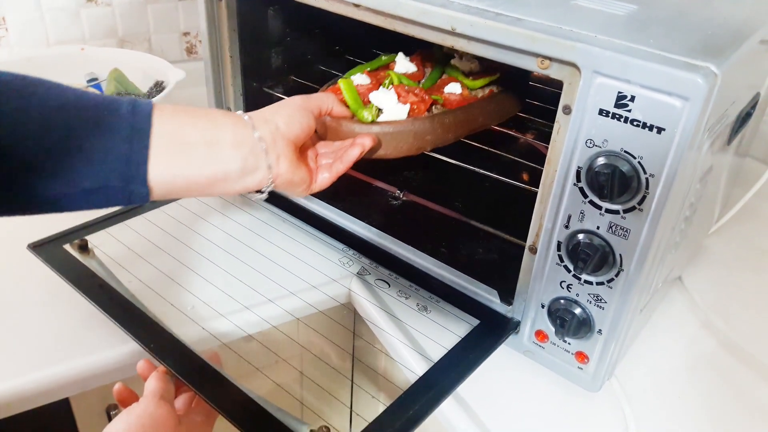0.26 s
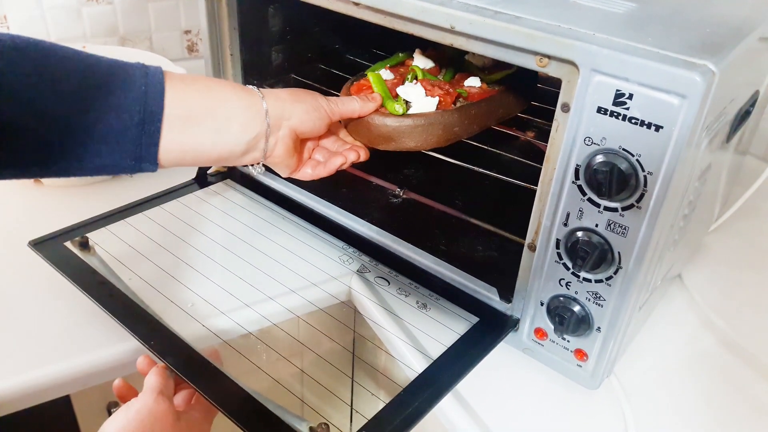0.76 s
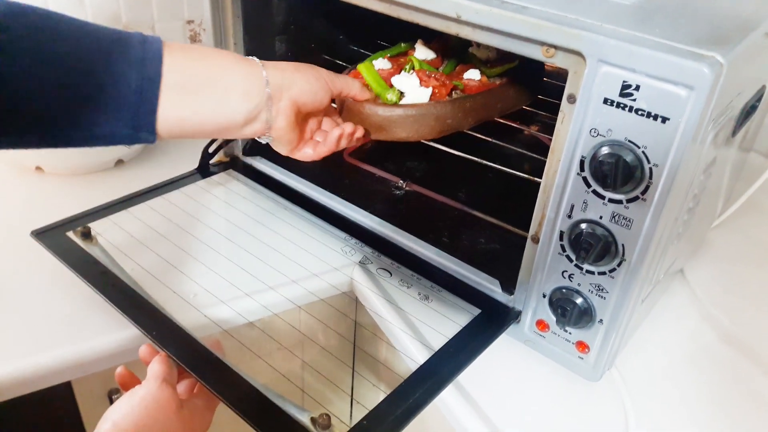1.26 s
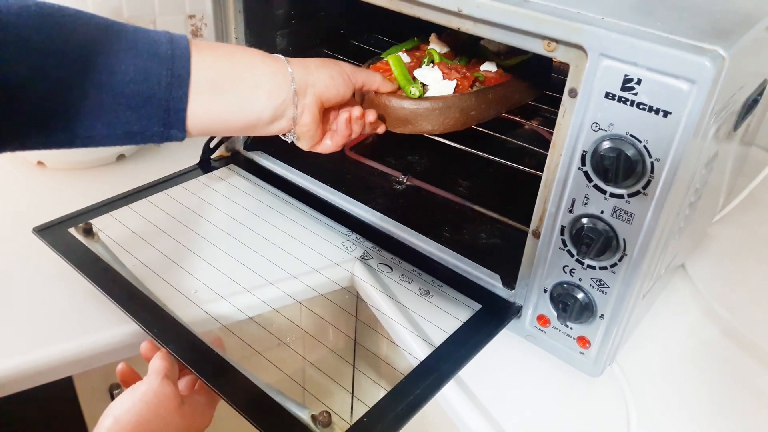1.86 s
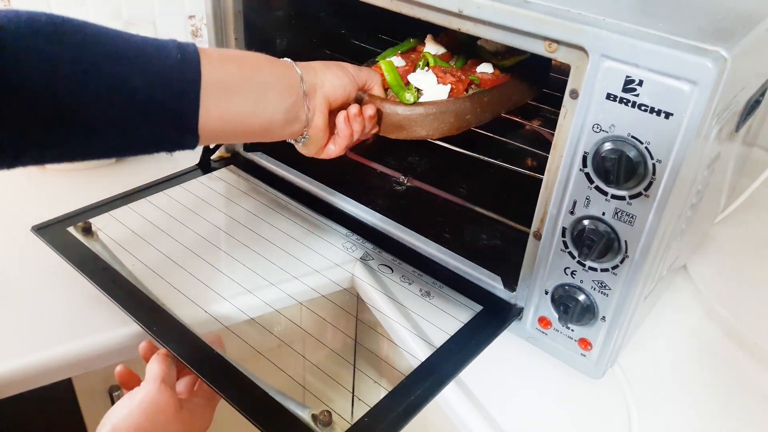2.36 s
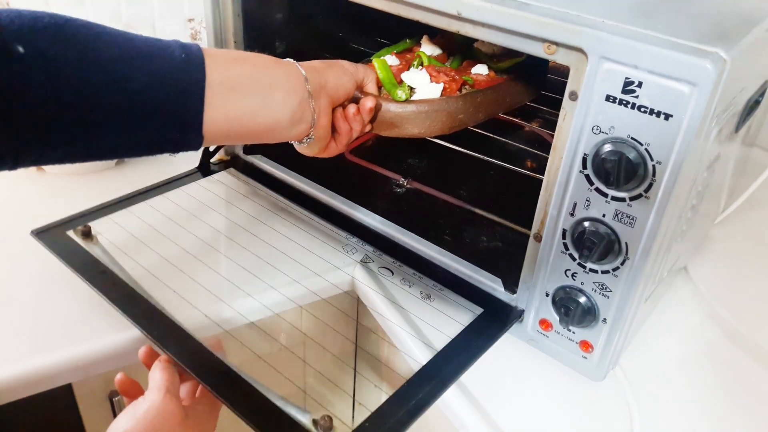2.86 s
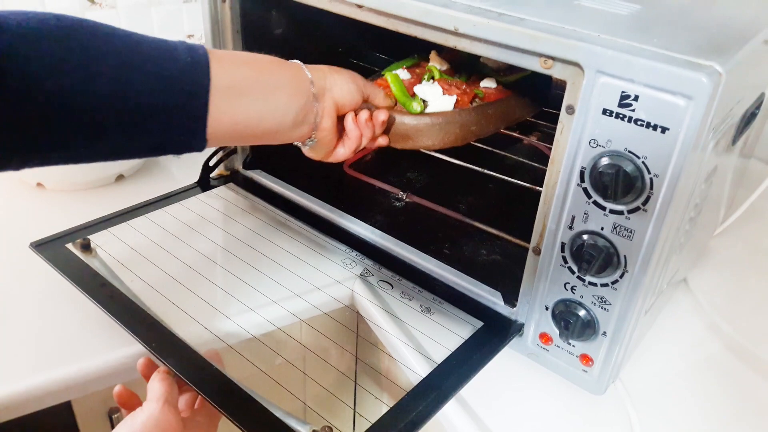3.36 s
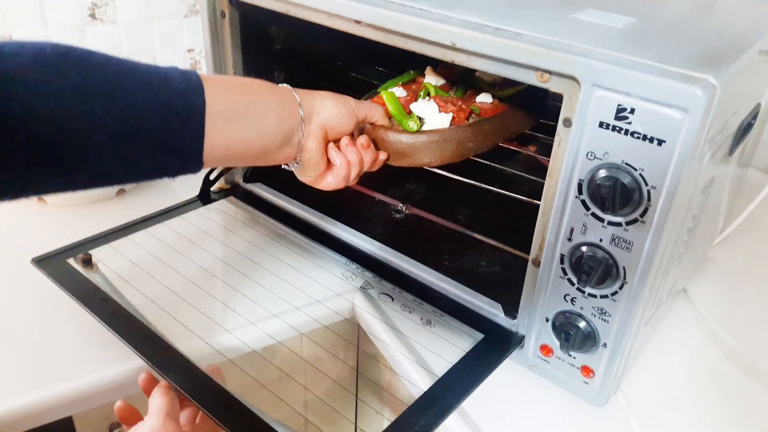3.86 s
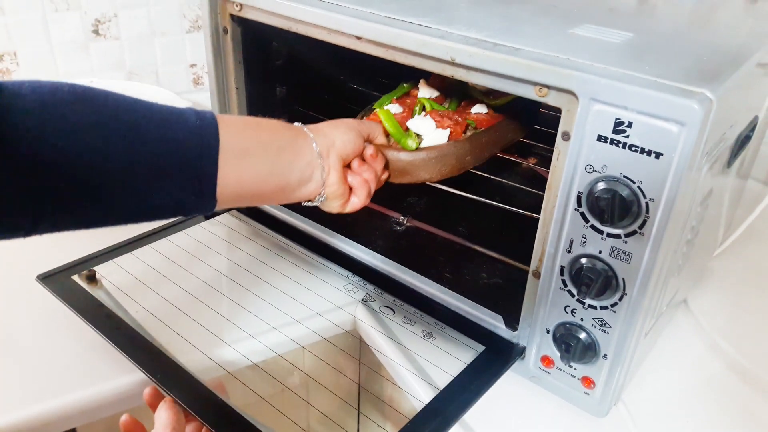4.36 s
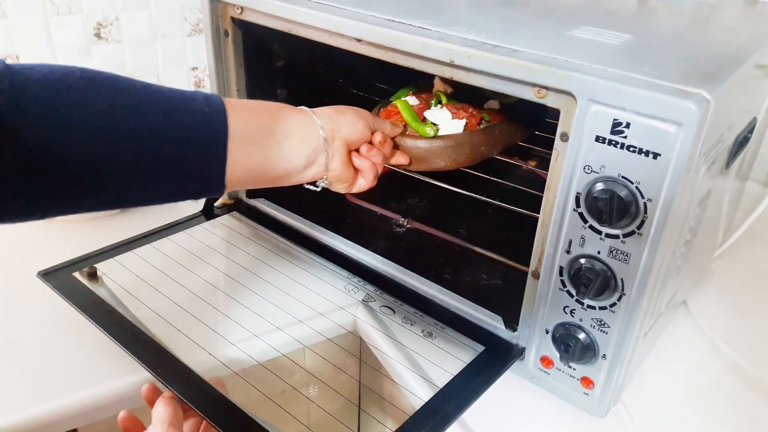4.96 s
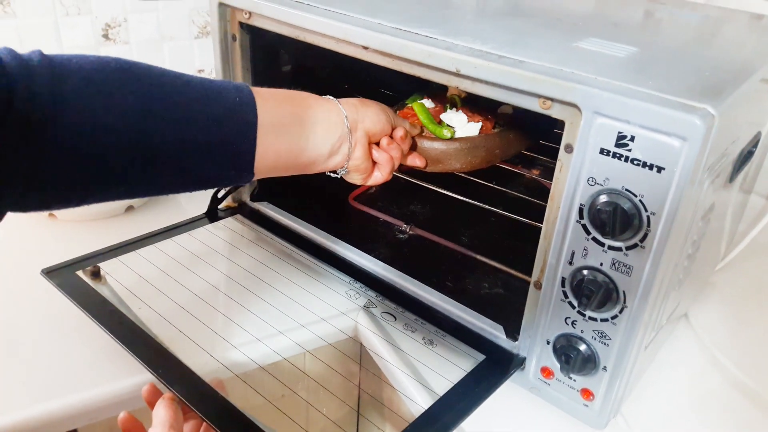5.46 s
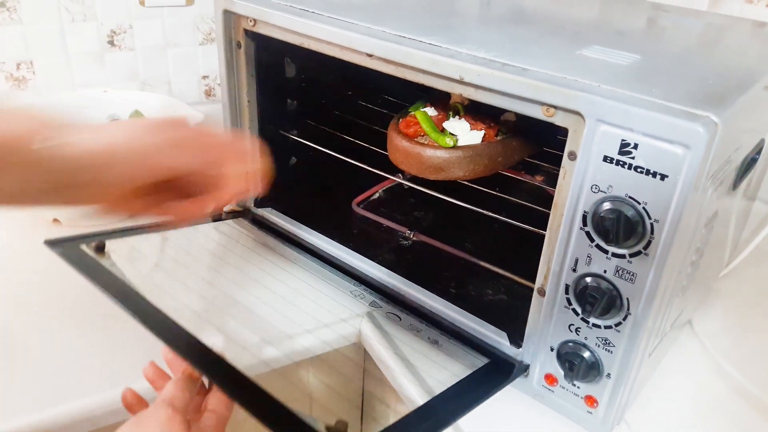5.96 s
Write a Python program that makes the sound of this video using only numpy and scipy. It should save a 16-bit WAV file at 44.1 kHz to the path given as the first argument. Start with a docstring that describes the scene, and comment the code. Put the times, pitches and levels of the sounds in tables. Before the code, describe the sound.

Short rough scrapes and clinks of earthenware on metal wires inside a small hollow oven, with faint ticking and a distant bird in a quiet kitchen.

```python
"""Clay grinds and knocks on wire: a baking dish is pushed in short strokes over the rack of a small open oven.
Rough noise and jolts drive the modes of dish, rack and box; knocks add chatter and ringing wires.
The sheet-metal box booms and the bumped rack rings low. The oven's timer ticks faintly as filtered noise bursts.
Farther off in the quiet kitchen a small bird chirps, a warbled whistle heard mostly as echo.
A microphone with two ports takes it in."""
import sys
import numpy as np
from scipy import signal
from scipy.fft import rfft, irfft
from scipy.io import wavfile
from scipy.ndimage import uniform_filter1d

SR = 44100
rng = np.random.default_rng(int(sys.argv[2]) if len(sys.argv) > 2 else 0)


def transcribe(signal):
    """Save signal, clipped to [-1, 1], as a 16-bit WAV file at the path in sys.argv[1]."""
    frames = np.atleast_2d(signal).T
    limited = np.clip(frames, -1, 1)
    pcm = np.round(limited * 32767).astype(np.int16)
    wavfile.write(sys.argv[1], SR, pcm)


def level_to_linear(level):
    """Convert decibel levels to linear amplitude factors, elementwise."""
    exponent = np.asarray(level, float) / 20
    return 10 ** exponent


N = 273323  # length [samples]


def evened(x):
    """Scales a signal to an rms of 1."""
    return x / np.sqrt(np.mean(x ** 2) + 1e-20)


def read(points, hz):
    """Reads a curve of (frequency, value) points along log frequency."""
    f, value = np.transpose(points)
    return np.interp(np.log(hz + 1), np.log(f + 1), value)


def add(mix, s, sound):
    """Adds a sound to the mix in place from time s, cut off at the end."""
    part = mix[..., round(s * SR):][..., :sound.shape[-1]]
    part += sound[..., :part.shape[-1]]


def humped(hz, broad, peaks):
    """Gain of a broad spectrum with resonances standing on it."""
    power = broad ** 2 + sum(level_to_linear(2 * db) / (1 + (2 * (hz - f) / w) ** 2) for f, w, db in peaks)
    return np.sqrt(power)


def causal(gain):
    """Minimum-phase impulse response of a gain curve, energy 1."""
    log = np.log(np.maximum(np.r_[gain, gain[-2:0:-1]], 1e-5))
    taps = np.fft.ifft(np.exp(log - 1j * signal.hilbert(log).imag)).real[:len(gain) // 2]
    return taps / np.linalg.norm(taps)


def ring(t, hz, t60):
    """One dying mode with a soft start."""
    return level_to_linear(-60 * t / t60) * np.sin(2 * np.pi * hz * t) * np.minimum(t * hz / 3, 1)


def strokes():
    """Levels of grinding, boom and grit, the rack's pitch and its shaking, from whichever stroke grinds loudest."""
    # pushes of the dish: (grit against grinding [dB], pitch of the rack before stiffening [Hz], shaking [dB],
    # curve of (time [s], grinding level [dB], boom level of the box [dB]))
    pushes = [ (-14.5, 203, -0.17, [(0.0, -47, -32.5), (0.15, -45, -36), (0.185, -42, -26.5),
              (0.225, -39.5, -31), (0.272, -37.5, -37), (0.352, -39.5, -28.5), (0.448, -41.5, -42),
              (0.486, -32, -30), (0.59, -48.5, -34.5), (0.664, -56, -61), (0.69, -60.5, -45)]),
              (-13.5, 189, 0.44, [(1.095, -58, -45), (1.122, -48, -42), (1.174, -49, -34),
              (1.272, -55, -45.5), (1.578, -49.5, -35.5), (1.62, -44, -33.5), (1.67, -45, -50),
              (1.758, -54.5, -46.5), (1.882, -73, -49), (1.935, -67.5, -61)]),
              (-16, 170, -11, [(2.105, -55, -49), (2.128, -53.5, -38), (2.135, -47, -28),
              (2.2, -52.5, -28.5), (2.235, -54, -31), (2.329, -52, -30), (2.419, -67, -39)]),
              (-14.5, 201, 0, [(2.43, -59, -41), (2.449, -51, -32), (2.531, -44, -36), (2.623, -57, -36.5),
              (2.647, -61.5, -52)]), (-21, 191, -2, [(2.715, -48, -38.5), (2.787, -49, -33.5),
              (2.917, -57.5, -43.5)]), (-21, 205, -1.5, [(3.02, -59, -41.5), (3.049, -58, -29.5),
              (3.113, -41, -48), (3.179, -51, -37.5), (3.245, -53.5, -54), (3.365, -47.5, -36),
              (3.473, -54, -41.5), (3.6, -67, -75)]), (-5.5, 216, -0.2, [(3.637, -59.5, -46.5),
              (3.691, -73.5, -57), (3.731, -65.5, -57)]), (-20.5, 190, -0.5, [(3.97, -55.5, -48),
              (4.052, -46.5, -31), (4.156, -41.5, -28.5), (4.232, -51.5, -40), (4.278, -56, -30),
              (4.35, -58.5, -41), (4.465, -48, -35)]), (-15.5, 220.5, 3.5, [(4.485, -34, -29),
              (4.579, -32.5, -33), (4.619, -32.5, -34), (4.677, -46.5, -37), (4.735, -58.5, -41.5),
              (4.801, -56, -56), (4.93, -63, -50)]), (-14.5, 208, -0.7, [(4.962, -39, -34.5),
              (5.048, -44.5, -36), (5.115, -44.5, -33), (5.14, -37.5, -30), (5.178, -47.5, -42),
              (5.278, -42.5, -36), (5.31, -44, -36), (5.452, -53, -37), (5.548, -70, -68)]), ]
    start_db_per_s, settle_db_per_s = 1498, 70  # a stroke sets in fast and the rack settles slowly
    stiffen_hz = 1200.5  # rise of the rack's pitch per unit of grinding force
    t, rows = np.arange(N) / SR, []
    for grit_db, rack_hz, shake_db, curve in pushes:
        s, grind_db, boom_db = np.transpose(curve)
        before_db = start_db_per_s * np.maximum(s[0] - t, 0)
        after_db = settle_db_per_s * np.maximum(t - s[-1], 0)
        grind_db = np.interp(t, s, grind_db) - before_db - after_db
        boom_db = np.interp(t, s, boom_db) - before_db - after_db
        pitch_hz = rack_hz + stiffen_hz * level_to_linear(grind_db)
        rows.append((grind_db, boom_db, grind_db + grit_db, pitch_hz, shake_db + 0 * t))
    rows = np.array(rows)
    strongest = rows[:, :1].argmax(axis=0)[None]
    return np.take_along_axis(rows, strongest, axis=0)[0]


def rubbing(grind_db, boom_db, grit_db, rack_hz, shake_db):
    """Sliding clay snags, sticks and breaks free: force on low, middle, bright and top modes, and the rack's hum."""
    hum_db, rumble_db = -9.5, -7.5  # the boom is part tone of the rack, part noise on the low modes
    jolts_per_s, jolt_db, thump_db = 70, 15.5, 6  # breaking free gives a tick and a short one-sided thump
    snags = level_to_linear(3.43 * np.minimum(rng.exponential(1, N), 4.8))
    snags *= (rng.random(N) < 1200 / SR) * rng.choice([-1, 1], N)
    uneven_db = 1.3 * evened(uniform_filter1d(rng.standard_normal(N), 500))  # the hand's pressure wavers
    rough = evened((evened(snags) + 0.87 * rng.standard_normal(N)) * level_to_linear(uneven_db))
    jolts = level_to_linear(3.5 * np.minimum(rng.exponential(1, N), 3)) * (rng.random(N) < jolts_per_s / SR)
    low_db = boom_db + rumble_db + shake_db
    bright_db = 0.54 * grind_db + 0.43 * grit_db
    force = (rough - level_to_linear(jolt_db) * jolts) * level_to_linear(np.array([low_db, grind_db, bright_db, grit_db]))

    # the rubbed rack keeps humming, its pitch shaken by the rough contact
    shake, swell = (evened(uniform_filter1d(v, 1000)) for v in rng.standard_normal((2, N)))
    shaken_hz = rack_hz * (1 + 0.04563 * level_to_linear(shake_db) * shake)
    swell_db = 0.95 * level_to_linear(shake_db) * swell
    tones = level_to_linear(boom_db + hum_db + swell_db) * np.sin(2 * np.pi * np.cumsum(shaken_hz) / SR)
    thumps = np.convolve(jolts * level_to_linear(grind_db + thump_db), np.hanning(70))[:N]
    tones -= signal.lfilter(*signal.butter(2, 170, "high", fs=SR), thumps)  # the small box radiates no deep bass
    return force, tones


def knocks(force, tones, grind_db):
    """Adds knocks: the dish chatters briefly on a wire, pushes the box softly and rings wires near the struck spot."""
    # knocks of the dish on the wires: (time [s], level [dB], clink against it [dB], brightness against it [dB],
    # pitch near which the struck spot rings [Hz])
    hits = [(0.08, -31.5, -17, -22, 1160), (0.105, -20.5, -35, -4.5, 1170),
            (0.383, -29.5, -2.5, -4.5, 1160), (0.481, -21.5, -13, -6.5, 1340), (0.513, -18, -2, -5.5, 2030),
            (1.174, -29.5, -1.5, -10.5, 594), (1.364, -38.5, -18, 2.5, 1470), (1.417, -30, -5, -2, 1500),
            (1.482, -30, 0.5, -4.5, 1920), (1.538, -31.5, -6, -8.5, 2040), (1.566, -28.5, -6, -12, 1450),
            (1.601, -23, -3.5, -5.5, 1236), (1.665, -35.5, -22, 1.5, 1320), (1.832, -41, -1, -18, 600),
            (2.133, -27.5, -4, -12, 1340), (2.249, -25.5, -14, -12.5, 680),
            (2.326, -30.5, -15.5, -20, 1280), (2.44, -43, -0.5, -2, 704), (2.715, -32, -18, -8.5, 2216),
            (3.028, -35, -18, -10, 1050), (3.061, -32, -7, -10.5, 590), (3.096, -21.5, -2, -2.5, 1100),
            (3.117, -26, -3, -17, 1170), (3.287, -30.5, -10, -17, 1940), (3.369, -22, 0.5, -8.5, 1834),
            (3.503, -43, -1, -0.5, 2100), (3.692, -44, -4, -7, 1124), (3.986, -38.5, -3, -5.5, 1077),
            (4.029, -21, -6, -5, 664), (4.107, -20.5, -12, -12, 1100), (4.255, -22, -4, -9.5, 1490),
            (4.378, -38.5, 4.5, -16, 2010), (4.422, -40, -9, -16, 1380), (4.451, -33.5, -2, -19.5, 1272),
            (4.482, -20, -7, -3, 1610), (4.506, -18, -14, -3.5, 1590), (4.549, -16, -13, -8, 1740),
            (4.57, -19.5, -3, -3.5, 666), (4.853, -37, -34, -3.5, 694), (4.956, -32, 2, -1, 2117),
            (5.034, -33, 0.5, 1.5, 705), (5.099, -26, -5.5, -7, 675), (5.128, -24.5, -0.5, -7.5, 644),
            (5.147, -26.5, -10, -5, 1130), (5.236, -25, -12, -12, 1680), (5.264, -25, -9, -8, 1570),
            (5.329, -24.5, -7, -7.5, 1934), (5.384, -24.5, -7.5, -4.5, 1500), (5.42, -31, -7.5, -9, 1097)]
    # wires of the rack: (frequency [Hz], decay time t60 [s])
    wire_modes = [(597, 0.035), (675, 0.085), (750, 0.062), (980, 0.043), (1075, 0.073), (1170, 0.1),
                  (1310, 0.073), (1460, 0.049), (1545, .065), (1680, 0.093), (1935, 0.034), (2110, 0.04),
                  (2210, 0.17), (2400, 0.041)]
    rattle_t60_s, rattle_rise_s = 0.071, 0.001
    climb_s, look_back_s = 0.011, 0.021  # a sliding dish climbs on to the wire: slower when grinding rivals the knock
    spot_octaves, octave_db = 0.056, -12.5  # spread of the spot; modes an octave away ring too
    grit_slope, grit_db = 1.5, -5  # the top treble follows the brightness
    blunt_hz = 11100  # rounded clay softens the top
    t = np.arange(SR // 2) / SR
    short_t = t[:6000]
    slowness = np.array([[1], [.8], [.6]])  # the treble rises and dies first
    fade = level_to_linear(-60 * short_t / (rattle_t60_s * slowness))
    wires = np.array([ring(t, hz, t60) for hz, t60 in wire_modes])
    wire_hz = np.transpose(wire_modes)[0]
    for s, db, clink_db, bright_db, hz in hits:
        rise_s = rattle_rise_s + climb_s * level_to_linear(grind_db[round((s - look_back_s) * SR)] - db)
        shape = fade * (1 - np.exp(-short_t / (rise_s * slowness))) ** 2
        levels_db = db + np.array([[-3], [bright_db], [grit_slope * bright_db + grit_db]])
        noise = rng.standard_normal(6000)
        # a small hard spot misses the low modes
        chatter = signal.lfilter(*signal.butter(2, 0.52 * hz, "high", fs=SR), noise)
        chatter = signal.lfilter(*signal.butter(2, blunt_hz, fs=SR), chatter)
        add(force[1:], s - .0025, chatter * shape * level_to_linear(levels_db))
        add(force[0], s, level_to_linear(db - 12.5) * np.hanning(40))  # one soft push on the box
        off = np.abs(np.log2(wire_hz / hz))
        near = np.exp(-(off / spot_octaves) ** 2)
        near += level_to_linear(octave_db) * np.exp(-((off - 1) / spot_octaves) ** 2)
        clink = near / np.linalg.norm(near) @ wires
        add(tones, s, level_to_linear(db + clink_db) * clink * (1 - np.exp(-t / rise_s)))


def bumps(tones):
    """Adds bumps of the whole rack, which rings low, longest once the hand lets go."""
    # bumps: (time [s], level before beating [dB], decay time t60 [s])
    rack_bumps = [(0.224, -26, 0.14), (2.144, -28.5, 0.16), (3.135, -48, 0.11), (4.556, -19.5, 0.21),
                  (5.47, -50, 1)]
    t = np.arange(SR // 2) / SR
    beat = 1 + 0.63 * np.cos(2 * np.pi * 22 * t)  # close modes beat at 22 Hz
    for s, db, t60 in rack_bumps:
        add(tones, s, level_to_linear(db) * ring(t, 312, t60) * beat)


def oven():
    """The contact force rings dish, rack and box, each range of modes by its own share."""
    # dish, rack and box together, broad colour: (frequency [Hz], relative level per Hz [dB])
    colour = [(29, -64), (50, -25.5), (193, 13.5), (257, 5), (312, 1), (437, -10), (674, -7.5), (857, -15),
              (1420, -10), (2600, -13.5), (3300, -8), (8250, -16.5), (10000, -29.5), (14300, -23),
              (15800, -40)]
    # their resonances: (frequency [Hz], width [Hz], relative level [dB])
    modes = [(667.0, 23, 0), (1170, 160, -7.5), (1450, 12.5, 1.5), (1890, 25, -11.0), (2000, 91, -6),
             (2327, 25, -15), (2866, 21, -31), (3030, 115, -26), (4080, 300, -5.0), (4410, 57, 2),
             (4690, 170, -32), (5200, 140, -11), (5360, 140, -23), (6230, 290, -6.5), (6170, 92, -19),
             (7050, 62, -15.5), (7300, 42, -33), (6960, 73, -31.5), (7200, 24, -42), (7950, 66, -29.5),
             (8400, 36, -54), (106.6, 4.4, 11.0), (186, 3.8, 16), (205, 8.3, -8), (298, 8.8, 11.5),
             (296, 5.0, 9), (499.4, 35.0, 0.0), (958.0, 100, -8.5), (1033, 11.0, 1)]
    levels = strokes()
    force, tones = rubbing(*levels)
    knocks(force, tones, levels[0])
    bumps(tones)
    hz = np.fft.rfftfreq(32768, 1 / SR)
    body = humped(hz, level_to_linear(read(colour, hz) + 3.5), modes)
    # power shares of the low, middle, bright and top modes
    under = [0 * hz] + [1 / (1 + (hz / edge) ** 8) for edge in (430, 2800, 5600)] + [1 + 0 * hz]
    parts = np.sqrt(np.maximum(np.diff(under, axis=0), 0))
    return tones + sum(signal.oaconvolve(f, causal(body * p))[:N] for f, p in zip(force, parts))


def timer():
    """The oven's clockwork timer ticks evenly and faintly: short noise bursts, coloured."""
    # colour of a tick: (frequency [Hz], relative level per Hz [dB])
    tick_colour = [(1500, 1), (4000, 3), (7000, 8), (9500, -26), (12000, 7), (15800, -23)]
    first_s, gap_s = .2060, .26438
    t, out = np.arange(1500) / SR, np.zeros(N)
    for s in np.arange(first_s, N / SR, gap_s):
        stray_db = 2 * rng.standard_normal()
        add(out, s, level_to_linear(-59.5 + stray_db - 60 * t / 0.031) * rng.standard_normal(len(t)))
    hz = np.fft.rfftfreq(1024, 1 / SR)
    return signal.oaconvolve(out, causal(level_to_linear(read(tick_colour, hz))))[:N]


def bird():
    """A whistle that leaps up, falls and arches again, with a fast uneven warble, mostly heard as echo."""
    # chirps: (time [s], relative level [dB])
    chirps = [(0.93, -40), (1.232, -38), (1.611, -41), (2.711, -39.5), (3.112, -41.5), (3.784, -41.5),
              (4.075, -42.5), (4.423, -41.5), (4.749, -41), (5.331, -40.5)]
    # course of one chirp: (time [s], pitch before warble [Hz], relative level [dB])
    song = [(0, 4273, -13), (.008, 4400, -10), (.022, 4777, 0.5), (.042, 4780, -25), (.062, 3533, -6),
            (.078, 3115, -14.5), (.107, 3750, -7.5), (.127, 3400, -18), (0.151, 3224, -25),
            (0.168, 3000, -43)]
    warble_hz, warble_depth_hz = 215.7, 335  # mean rate, swing of the pitch to either side
    s, *columns = np.transpose(song)
    t, out = np.arange(0, s[-1], 1 / SR), np.zeros(N)
    pitch_hz, level_db = (np.interp(t, s, c) for c in columns)
    for start, db in chirps:
        rate_hz = warble_hz * (1 + 0.44 * evened(uniform_filter1d(rng.standard_normal(len(t)), 200)))
        warble = 2 * np.pi * (np.cumsum(rate_hz) / SR + rng.random())
        phase = 2 * np.pi * np.cumsum(pitch_hz + warble_depth_hz * np.sin(warble)) / SR
        whistle = np.sin(phase) + level_to_linear(-27) * np.sin(2 * phase)
        add(out, start, level_to_linear(db + level_db + 1.8 * np.cos(warble)) * whistle)
    return level_to_linear(-3.5) * out + level_to_linear(0.5) * echoes(out, 2.74, 0.0035)


def echoes(x, t60_scale, gap_s):
    """Three sparse tails fade in and out in turn, so the echo keeps no fixed colouring; each dies by band."""
    # likeness of the two sides, the bass alike: (frequency [Hz], left-right likeness [0-1])
    likeness = [(100, 1), (400, 0.86), (900, 0.27), (2000, 0.029), (8000, 0.12)]
    # decay before scaling by t60_scale: (frequency [Hz], decay time t60 [s])
    decay = [(100, 0.41), (300, 0.7), (1000, 0.44), (4000, 0.12), (12000, 0.17)]
    # colour of the echo: (frequency [Hz], relative level [dB])
    echo_colour = [(150, -7.5), (500, 2), (1500, 1), (5000, 5), (13000, 6.5)]
    taps, out = np.zeros((3, 2, SR)), np.zeros((2, N))
    at = np.arange(0, SR - 20, 20)
    at = at + rng.integers(0, 20, (3, 2, len(at)))  # one reflection in every 20 samples
    np.put_along_axis(taps, at, rng.choice([-1., 1.], at.shape), 2)
    hz, t, z = signal.stft(taps, SR, nperseg=256)
    same = np.clip(read(likeness, hz), 0, 1)[:, None]
    z[:, 1] = same * z[:, 0] + np.sqrt(1 - same ** 2) * z[:, 1]
    fade = level_to_linear(-60 * t / (t60_scale * read(decay, hz))[:, None])
    fade *= level_to_linear(read(echo_colour, hz))[:, None] / np.linalg.norm(fade, axis=1, keepdims=True)
    tails = signal.istft(z * fade, SR, nperseg=256)[1] * np.sqrt(20 / 128)
    for k, tail in enumerate(tails):
        share = np.sqrt(2 / 3) * np.cos(np.pi * (6.0 * np.arange(N) / SR + k / 3))
        add(out, gap_s, signal.oaconvolve((x * share)[None], tail, axes=1))
    return out


def kitchen():
    """Quiet room noise with faint humming bands and drifting patches, shaped in short spectra."""
    # colour of the room noise: (frequency [Hz], relative level per Hz [dB])
    air = [(24, -55), (40, -1), (65, 7), (110, 1.5), (230, 2.5), (268, 0.5), (513, -4.5), (728, -7.5),
           (1500, -7), (1750, -9.5), (3270, -14.5), (5260, -18.5), (6420, -23), (15800, -28.5)]
    # faint bands in the kitchen's hum: (frequency [Hz], width [Hz], relative level before a 4 dB lift [dB])
    whine = [(579, 10.2, 7), (1710, 17, -19), (1815, 98, -1.5)]
    # likeness of the two sides: (frequency [Hz], left-right likeness [0-1])
    likeness = [(30, 0.45), (150, 1), (500, 0.49), (1500, 0.033), (5000, 0.033)]
    frames, hz = N // 256 + 5, np.fft.rfftfreq(1024, 1 / SR)
    a, b, c, d, patches = rng.standard_normal((frames, 513, 5)).T
    patches = evened(uniform_filter1d(uniform_filter1d(patches, 8, 0), 14, 1))
    same, left = np.clip(read(likeness, hz), 0, 1)[:, None], a + 1j * b
    right = same * left + np.sqrt(1 - same ** 2) * (c + 1j * d)
    z = np.array([left, right])
    bands = [(f, w, db + 4) for f, w, db in whine]
    z *= humped(hz, level_to_linear(read(air, hz)), bands)[:, None] * level_to_linear(1.6 * patches)
    noise = signal.istft(z, nperseg=1024, noverlap=768)[1][:, :N]
    return level_to_linear(-56.5) * evened(noise)


def scene():
    """The direct sound reaches the left port a little earlier; the box and the kitchen echo it."""
    near = oven() + timer()
    direct = np.array([near, np.roll(near, 3)])  # right port 3 samples later
    close_by = level_to_linear(1.0) * (direct + echoes(near, 0.62, 0.000965))  # raised by 1 dB
    return close_by + bird() + kitchen()


def roll_off(x):
    """The treble ends steeply here."""
    return signal.sosfilt(signal.butter(12, 16280, fs=SR, output="sos"), x)


def record(dry):
    """The microphone cuts the deep bass and its two ports differ in colour; the band is then limited at 16.1 kHz."""
    # colour of the ports: (frequency [Hz], left over right [dB])
    lean = [(60, -1.5), (99, -1.5), (160, 0.5), (270, 0.5), (450, 0.5), (740, 0.0), (1220, -0.5),
            (2010, 0.0), (3330, 0.5), (5500, 2.5), (9080, 6.5), (15000, 2.0)]
    hz = np.fft.rfftfreq(N, 1 / SR)
    lean_db = read(lean, hz) / 2  # half to each port
    bass_cut = 1 / np.sqrt(1 + (70 / (hz + 1)) ** 6)
    band_limit = 1 / (1 + (hz / 16100) ** 80)
    ports = level_to_linear(np.array([lean_db, -lean_db]))
    mix = irfft(rfft(dry) * bass_cut * band_limit * ports, N)
    return roll_off(mix)


dry = scene()
out = record(dry)
transcribe(out)
```